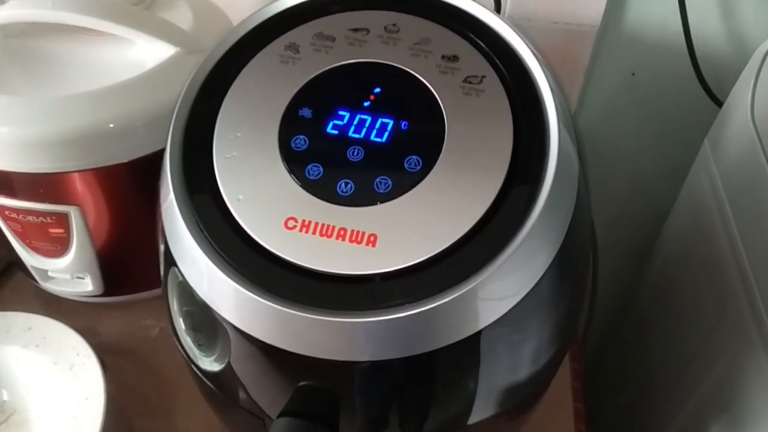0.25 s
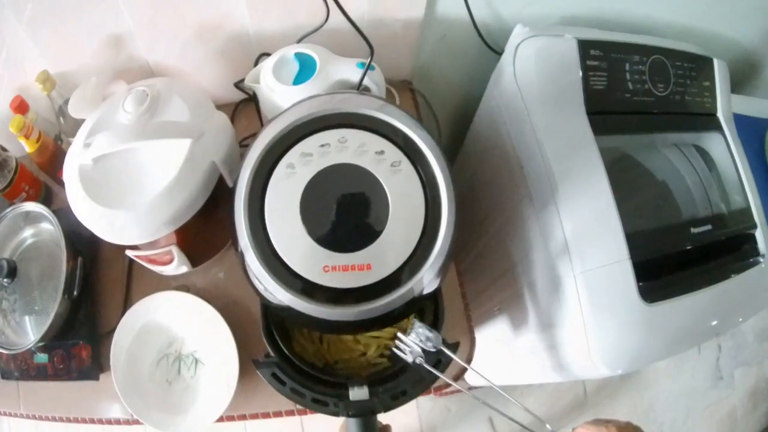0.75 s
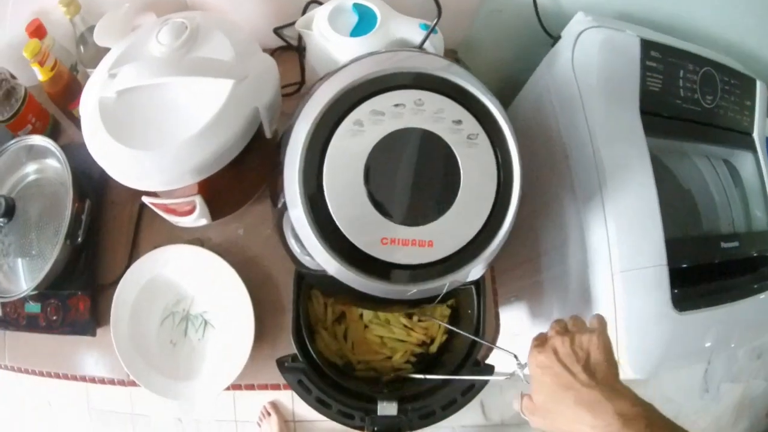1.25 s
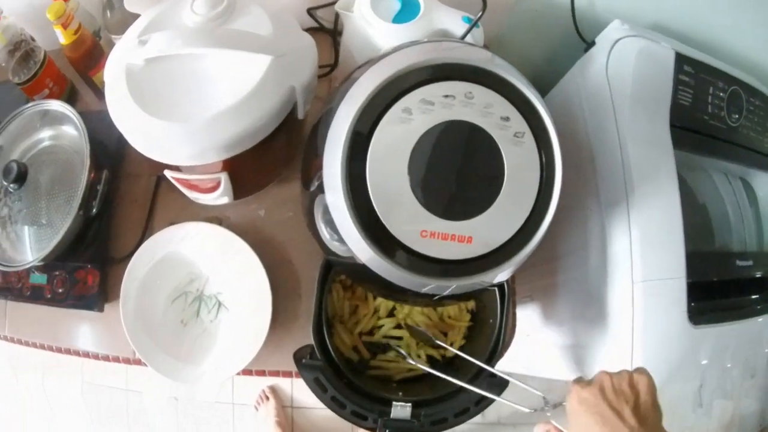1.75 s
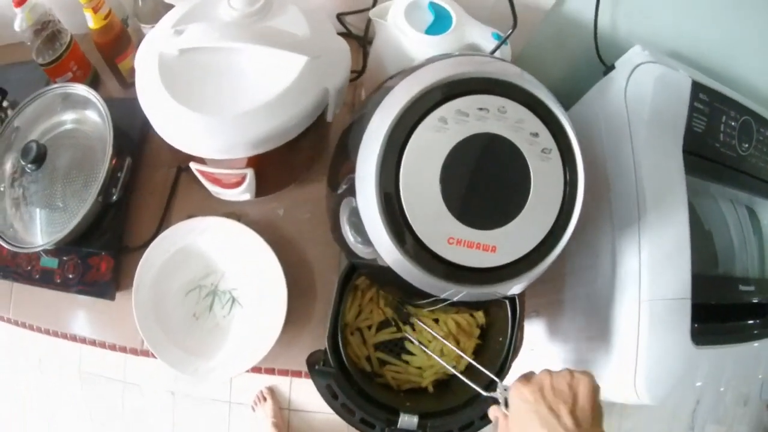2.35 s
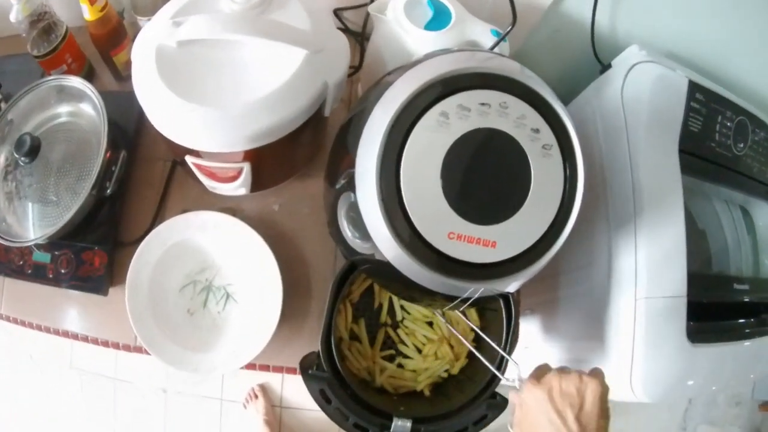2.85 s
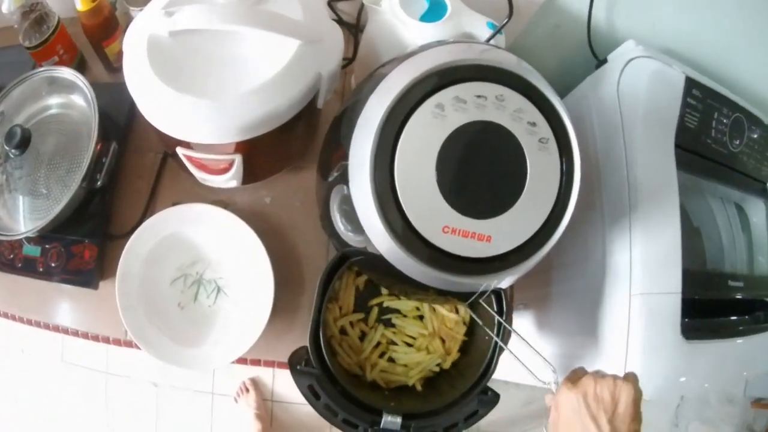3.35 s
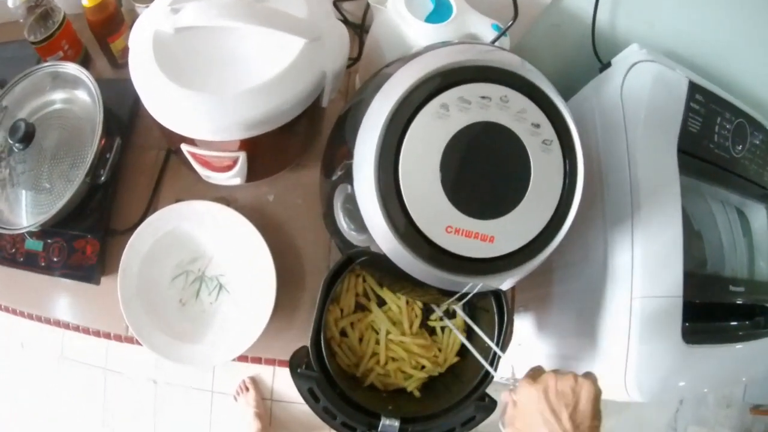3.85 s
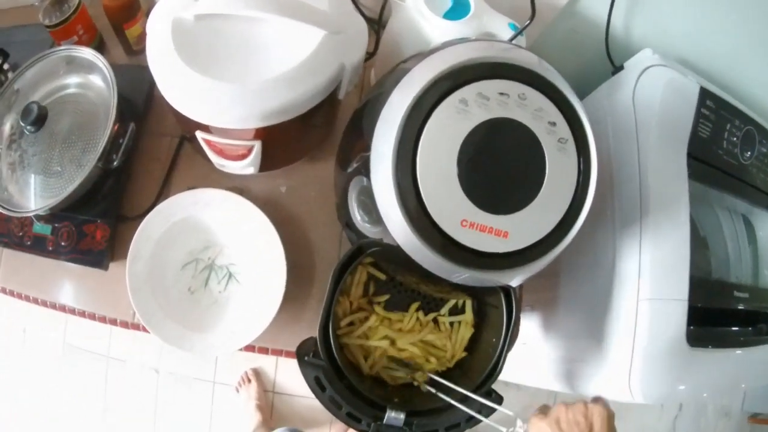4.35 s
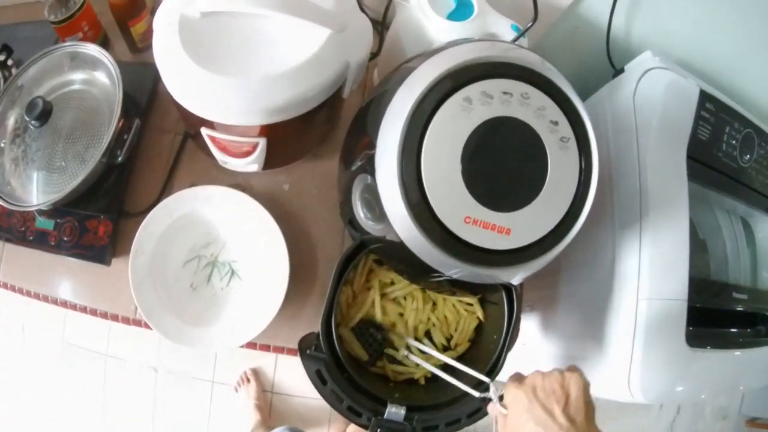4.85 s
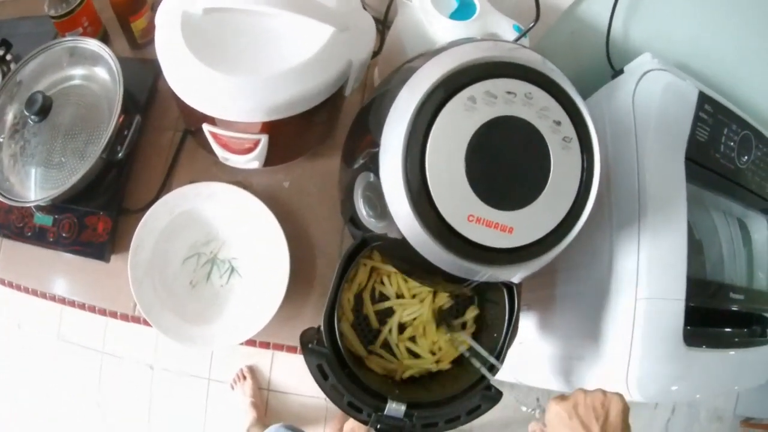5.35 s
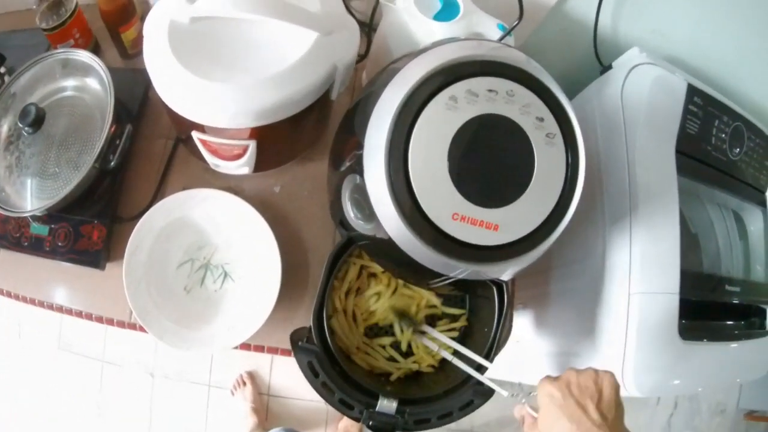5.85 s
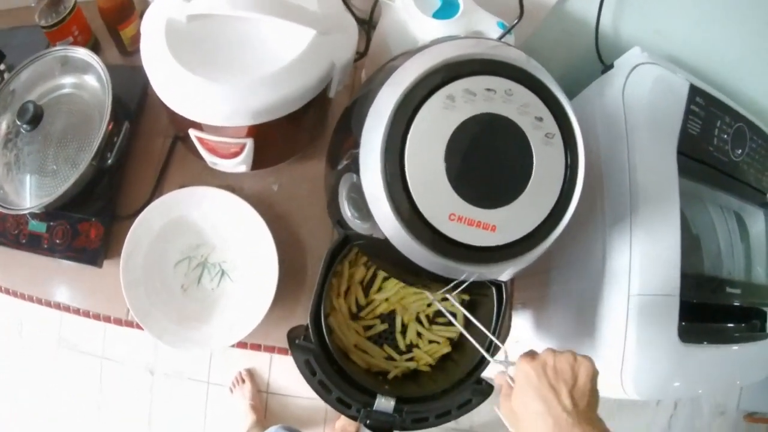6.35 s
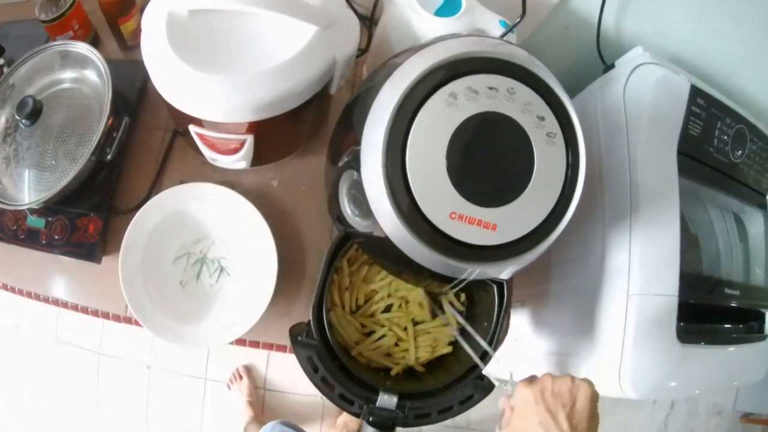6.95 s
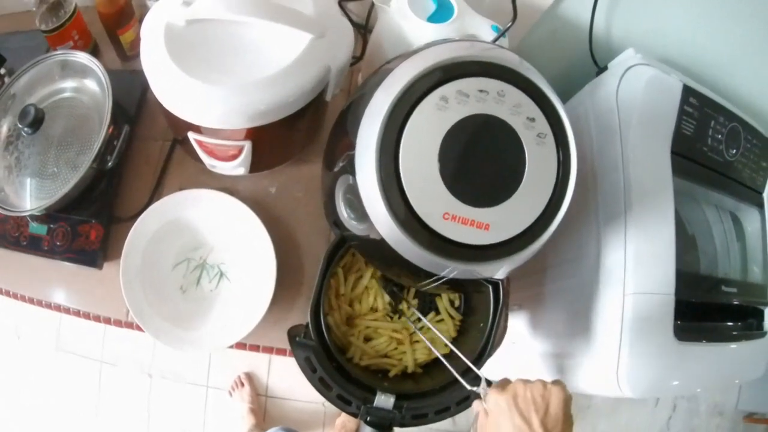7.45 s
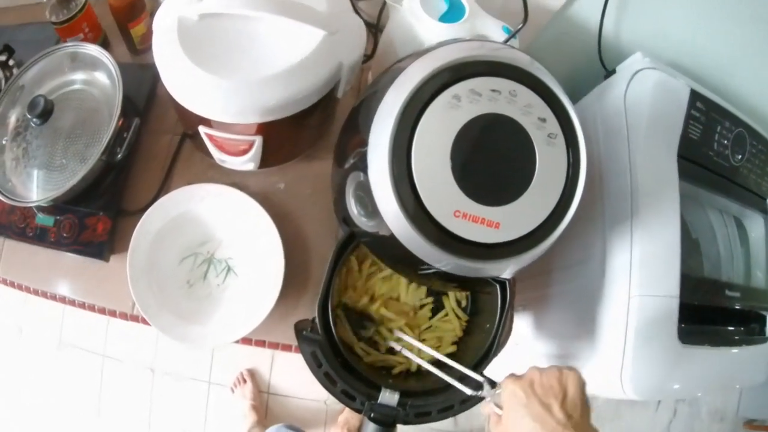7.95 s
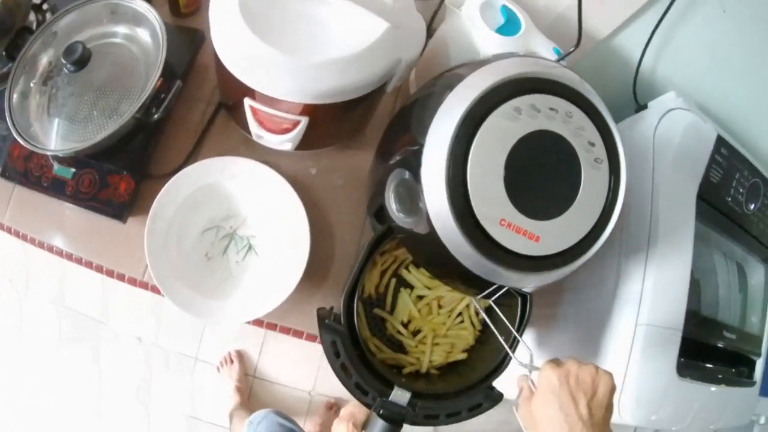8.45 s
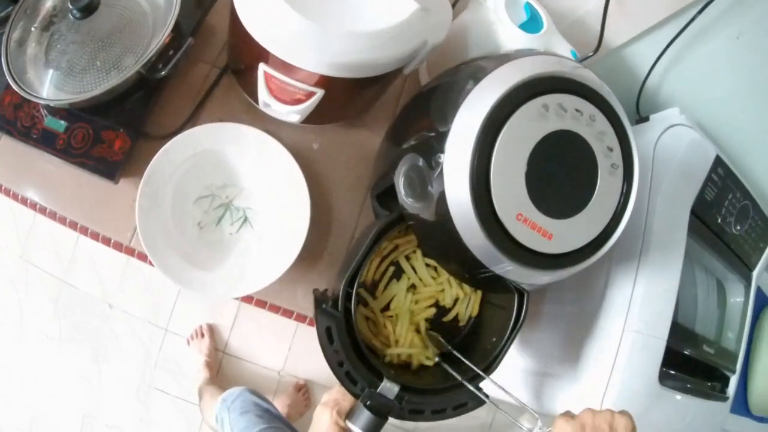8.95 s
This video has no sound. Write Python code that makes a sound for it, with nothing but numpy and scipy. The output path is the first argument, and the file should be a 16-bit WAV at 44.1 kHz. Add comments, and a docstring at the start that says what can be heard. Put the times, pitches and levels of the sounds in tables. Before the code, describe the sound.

Metal tongs scrape and clink around a perforated metal basket, turning crisp fries in a small tiled kitchen over faint hum and hiss.

```python
"""Steel tongs turn fries in a perforated metal basket in a small tiled kitchen: the tips drag and knock.
Drags: random snags excite steel modes and a dense sheet response; crisp fries tick. Knocks: decaying modes,
noise and a bright snap. Squeaks: rough sines. Behind: a dull echo, noise-band hum, hiss with a thin high
tone, and soft bass bumps."""
import sys
import numpy as np
from scipy import signal
from scipy.fft import rfft, irfft, next_fast_len
from scipy.io import wavfile
from scipy.ndimage import uniform_filter1d, map_coordinates

SR = 44100
rng = np.random.default_rng(int(sys.argv[2]) if len(sys.argv) > 2 else 0)


def bounce(signal):
    """Save signal as a 16-bit WAV file at the path given by the first command-line argument."""
    frames = np.transpose(np.atleast_2d(signal))
    limited = np.clip(frames, -1, 1)
    pcm = np.round(limited * 32767).astype(np.int16)
    wavfile.write(sys.argv[1], SR, pcm)


N = 404838


def amp(db):
    """Linear gain of a level in dB."""
    return 10 ** (np.asarray(db) / 20)


def unit(x):
    """x scaled to rms 1."""
    return x / np.sqrt(np.mean(x ** 2) + 1e-20)


def along(points, hz):
    """(Hz, value) points interpolated on a log-frequency axis."""
    point_hz, value = np.transpose(points)
    return np.interp(np.log(hz + 1), np.log(point_hz + 1), value)


def wobble(rate_hz):
    """Random curve, linear between normal-distributed knots at rate_hz."""
    knots = rng.standard_normal(int(N * rate_hz / SR) + 4)
    return map_coordinates(knots, [np.arange(N) * rate_hz / SR], order=1)


def filtered(x, response):
    """x times a response of frequency, by FFT."""
    size = next_fast_len(N + 8192)
    spectrum = rfft(x, size) * response(np.fft.rfftfreq(size, 1 / SR))
    return irfft(spectrum, size)[..., :N]


def through(x, answer, size):
    """Overlapping pieces of x, each through a fresh random answer, so no fixed colour stands out."""
    out = np.zeros(N + SR + size)
    fade = np.hanning(2 * size + 1)[:-1]
    padded = np.pad(x, (size, 2 * size))
    for start in range(0, N + size, size):
        piece = signal.fftconvolve(padded[start:start + 2 * size] * fade, answer())
        out[start:start + len(piece)] += piece
    return out[size:size + N]


# Spectrum of hiss and rumble: (f/Hz, relative level/dB per Hz)
AIR_SPECTRUM = [(12, -36), (20, -14), (103, -0.5), (156, -2), (185, -2.5), (237, -4.5), (288, -3.5),
                (425, -7.5), (502, -8), (1060, -10.5), (2250, -16), (2510, -15), (4380, -18), (5040, -19.5),
                (15300, -20.5)]
# Hum bands: (f/Hz, half-width at half amplitude/Hz, mean level/dB)
HUM_BANDS = [(61, 24, -63.5), (144.5, 16, -70.5), (185.3, 14, -68), (1090, 107, -68.5), (1237, 58, -64.5),
             (12225, 14, -74)]
AIR_DB = -54.5  # mean level


def room_tone():
    """Shaped noise for hiss and rumble, plus narrow noise bands of wavering level for hum."""
    def noise(response):
        return unit(filtered(rng.standard_normal(N), response))

    air = noise(lambda f: amp(along(AIR_SPECTRUM, f)))
    hum = np.zeros(N)
    for hz, width_hz, db in HUM_BANDS:
        level = amp(db + 0.67 * wobble(5))
        hum += level * noise(lambda f: 1 / (1 + ((f - hz) / width_hz) ** 2))
    return amp(AIR_DB + 0.47 * wobble(4)) * air + hum


def kitchen(x):
    """Tiled walls answer with a short, dull tail of low-passed, decaying noise."""
    t = np.arange(SR // 2) / SR
    fade = amp(-60 * t / 0.47)  # t60 0.47 s

    def tail():
        dull_noise = signal.lfilter([1], [1, -.4], rng.standard_normal(len(t)))
        return dull_noise * fade / np.linalg.norm(fade)

    delayed = np.pad(x, (200, 0))[:N]
    return through(delayed, tail, size=8192)


# Dull bass bumps: (t/s, nominal level/dB, f/Hz)
BASS_BUMPS = [(1.388, -48.5, 66), (2.199, -51, 70.0), (6.059, -47, 51.1), (6.619, -56, 48.4),
              (6.779, -43.5, 52.3), (7.568, -49, 68), (7.879, -47, 61.9)]


def bumps():
    """A few soft cycles of deep bass: sines under a rise-and-decay envelope."""
    out, t = np.zeros(N + SR), np.arange(SR // 5) / SR
    envelope = t / 0.017 * np.exp(1 - t / 0.014)
    for start_s, db, hz in BASS_BUMPS:
        out[round(start_s * SR):][:len(t)] += amp(db) * envelope * np.sin(2 * np.pi * hz * t)
    return out[:N]


# A sliding tip makes one mode sing: (t/s, nominal length/s, f/Hz, nominal level/dB)
TIP_SQUEAKS = [(1.598, 0.06, 4005, -54.5), (2.455, 0.018, 10150, -56), (3.129, 0.14, 1014, -61.5),
               (3.15, 0.093, 1242, -57), (4.16, 0.088, 1088, -58.5), (5.6, 0.14, 2330, -57),
               (5.64, 0.05, 3317, -46.5), (6.12, .08, 3340, -51), (6.047, 0.04, 3350, -44.5),
               (6.12, 0.045, 5320, -49), (6.333, 0.023, 3321, -52), (6.34, 0.031, 1034, -54.5),
               (6.385, 0.018, 4900, -58), (6.785, 0.023, 4150, -56), (7.581, 0.019, 10800, -50),
               (8.34, 0.042, 5220, -48)]


def squeaks():
    """A tip catches one mode: short sines of drifting phase and rough level, soft at both ends."""
    out, rough = np.zeros(N + SR), amp(2.5 * wobble(90))
    for start_s, length_s, hz, db in TIP_SQUEAKS:
        t = np.arange(round(1.6 * length_s * SR)) / SR
        swell = (1 - np.exp(-t / 0.0032)) * np.exp(-(t / length_s) ** 4)
        drift = np.cumsum(rng.standard_normal(len(t))) * 0.042
        tone = np.sin(2 * np.pi * hz * t + drift)
        out[round(start_s * SR):][:len(t)] += amp(db) * np.sqrt(2) * swell * tone
    return out[:N] * rough


# Small modes of the perforated sheet: (f/Hz, level/dB per Hz)
SHEET_SPECTRUM = [(900, -41), (1600, -15), (2000, -20), (2750, -8.5), (3100, -8.5), (3500, -3.5),
                  (3950, 0.5), (4450, -6.5), (5250, -0.5), (6300, -10), (7100, -5.5), (7900, -8),
                  (8800, -7.5), (11300, -9.5), (13600, -6.5), (15300, -14.5)]
# Sheet decay before damping: (f/Hz, nominal t60/s)
SHEET_DECAY = [(600, 0.72), (3000, 0.2), (6000, 0.15), (12000, 0.19)]


def sheet_ring(colour_db, damping, size):
    """One answer of the sheet to a tap, energy 1: noise that dies band by band."""
    hz, t, z = signal.stft(rng.standard_normal(size), SR, nperseg=256)
    t60 = along(SHEET_DECAY, hz)[:, None]
    fade_db = colour_db(hz)[:, None] - 60 * damping * t / t60
    ring = signal.istft(z * amp(fade_db), SR, nperseg=256)[1][:size]
    return ring / np.linalg.norm(ring)


# Large modes of basket and tongs: (f/Hz)
MODE_HZ = [780, 1060, 1150, 1290, 1639, 1730, 2051, 2307, 2579, 2762, 2840, 3321, 3430, 3660, 3828, 3973,
           4135, 4740, 4853, 4937, 5190, 5300, 5728, 5803, 6900, 7187, 8721, 9300, 10070, 10750]
# Same modes, same order, before tilt and damping: (relative level/dB, nominal t60/s)
MODE_LEVEL_T60 = [(-15, 0.34), (-8.5, 0.5), (-10.5, 0.81), (0.5, 0.18), (-12.5, 0.51), (-16, 0.26),
                  (-15.5, 0.61), (-11.5, 0.52), (-8.5, 0.24), (-8, 0.39), (-2.5, 0.23), (-5, 0.36),
                  (-0.5, 0.17), (-11, 0.15), (-4, 0.51), (-3, 0.33), (-17, 0.31), (-16, 0.19), (2, 0.22),
                  (-5.5, 0.15), (-0.5, 0.2), (-1.5, 0.16), (-18, 0.27), (-8.5, 0.39), (-2.5, 0.39),
                  (-22, 0.25), (-1, 0.18), (-26, 0.11), (-6, 0.14), (-6, 0.19)]
# Low clunk of the basket wall: (f/Hz, level/dB per Hz)
WALL_SPECTRUM = [(400, -25), (900, -14.5), (1500, -14.5), (3000, -35)]
# Tip knocks: (t/s, level/dB, clunk/dB, belly/dB, middle/dB, brightness/dB,
# low spot f/Hz, high spot f/Hz, lift near both/dB, damping factor)
TIP_KNOCKS = [(0.002, -36, 11, 1.5, -2, -8, 1290, 4850, 10, 2.1),
              (0.4436, -29.5, -8, -5.5, 1, 2, 3420, 5230, 5, 1.4),
              (1.1186, -34.5, -11, -3, -5, -8, 3900, 5180, 9, 1.2),
              (1.3476, -32, -10, -13, 0, -3, 3500, 6910, 11, 2),
              (1.7478, -34, -5, -16, 0, -6, 3450, 4860, 8, 1.05),
              (2.1157, -24.5, -11, -2, -0.5, -0.5, 3440, 6900, 7, 2.2),
              (2.2043, -27.5, -9, -13, -3, 7, 3900, 4900, 9, 1.7),
              (2.251, -27.5, -14, -6, 0.5, -2, 3430, 4770, 8.5, 1.45),
              (2.5176, -16, -8.5, 2.5, -1.8, -1, 3830, 5280, 5, 1.12),
              (3.1392, -36.5, -8, 1, -4, -2, 3320, 5300, 13, 1.6),
              (3.4508, -14.5, -3, 2.5, -5, -3, 2870, 5280, 7, 1.48),
              (4.1688, -39, -8, 10, 6, -13, 3840, 4760, 6, 1.45),
              (4.5456, -39, -8, -7, 0, -7, 3330, 4840, 12, 1.3),
              (4.6603, -33.5, -2, 1, -3, -9, 3430, 4960, 8, 2.6),
              (5.1503, -33, -13, -9, -2, -3, 3360, 5280, 13, 2.1),
              (5.6447, -32.5, -9, 6, 1, 8, 3330, 4640, 12, 1.8),
              (6.095, -36.5, -11, -3, 0, -4, 3360, 5400, 4, 1.2),
              (6.4794, -29, -9, -7, 0.5, -1, 3920, 4930, 4, 1.1),
              (7.587, -47, 2, -1.5, 5, 3, 3420, 10700, 8, 1.9),
              (7.9157, -19, -3, 2, -0.8, 0, 3980, 5300, 6, 0.93),
              (8.114, -36, 3, -3, -4, -6, 1290, 5300, 10, 1.8),
              (8.1607, -32.5, 2.5, -3.5, 1, -14, 3370, 5250, 4, 2.4),
              (8.2653, -32.5, -5, 0, 1, -1, 4740, 5300, 6, 2.5),
              (8.2724, -26, 2.5, 3.5, 4, -3, 4030, 4810, 9, 1.5),
              (8.3387, -31.5, -5, 6.5, -1.5, 2, 4260, 5200, 13, 1.5)]
STEP = 60  # samples between jolts of a rattling mode
SNAP_DB, SNAP_T60_S = -10.5, 0.011  # bright crack at contact, re peak of the blow
CLEAR_DB, CLEAR_PER_DB = -4.5, 0.16  # ring over clatter at 0 dB; gain per dB a knock is softer


def knocks():
    """Each knock shakes the whole sheet and rings the modes nearest its spot hardest."""
    out, t = np.zeros(N + SR), np.arange(SR // 3) / SR
    hz = np.array(MODE_HZ)[:, None]
    mode_db, t60 = np.transpose(MODE_LEVEL_T60)[..., None]

    def near(spot_hz):
        return np.exp(-(np.log(hz / spot_hz) / 0.027) ** 2)

    for (start_s, knock_db, clunk_db, belly_db, middle_db, bright_db,
         low_hz, high_hz, lift_db, damping) in TIP_KNOCKS:
        tilt = [(1350, clunk_db), (1650, belly_db), (2850, belly_db), (3300, middle_db),
                (4200, middle_db), (4700, 0), (6000, 0), (7000, bright_db)]
        level_db = mode_db + along(tilt, hz) + lift_db * (near(low_hz) + near(high_hz))
        level_db += 3.1 * rng.standard_normal(hz.shape)
        loaded_hz = hz * (1 + .003 * rng.standard_normal(hz.shape))  # fries and grip detune the steel
        jolts = rng.standard_normal((len(hz), len(t) // STEP)).cumsum(axis=1)
        rattle = 0.14 * hz / 4000 * np.repeat(jolts, STEP, axis=1)
        phase = 2 * np.pi * (loaded_hz * t + rng.random(hz.shape)) + rattle
        rings = np.sum(amp(level_db - 60 * damping * t / t60) * np.sin(phase), axis=0)

        def colour_db(f):
            return np.maximum(along(SHEET_SPECTRUM, f), along(WALL_SPECTRUM, f)) + along(tilt, f)

        clear = amp(CLEAR_DB - CLEAR_PER_DB * knock_db) * rings / np.linalg.norm(rings)
        blow = clear + sheet_ring(colour_db, damping, size=len(t))
        blow *= 1 - np.exp(-t / 0.0019)  # soft onset: the tip chatters before it lies flat
        crack = np.diff(rng.standard_normal(len(t) + 1))
        blow += amp(SNAP_DB - 60 * t / SNAP_T60_S) * np.abs(blow).max() * crack
        crest = 3 * np.sqrt(uniform_filter1d(blow ** 2, size=600).max())  # 3 x loudest short rms
        out[round(start_s * SR):][:len(blow)] += amp(knock_db) * blow / crest
    return out[:N]


# Tip strokes: (t of full speed/s, level/dB, rise/s, hold/s, fall/s, initial brightness/dB, initial body/dB)
TIP_STROKES = [(0.477, -49.5, .02, .01, 0.16, -5, 7.5), (0.674, -53.5, 0.088, .01, 0.13, 0, 1),
               (0.88, -68, 0.13, .005, 0.026, 2, 3), (.95, -69, 0.068, .003, 0.017, -1, 1),
               (1.088, -63, 0.032, .005, 0.068, -2, 1), (1.128, -51, .02, 0.028, 0.075, -19, 6),
               (1.344, -45, 0.33, .005, .09, -1.5, -4), (1.57, -53.5, .02, .06, 0.2, -8, 12.5),
               (1.756, -47, 0.072, .005, 0.12, -2.5, 1), (2.12, -48, 0.15, .005, 0.037, -17, -3),
               (2.15, -42, .08, 0.098, 0.13, -2.5, -2), (2.62, -49.5, 0.16, 0.046, 0.42, -6.5, 7),
               (2.73, -46, 0.049, .005, 0.092, -2.5, -4), (3.09, -45.5, 0.095, 0.063, 0.22, -4, 2),
               (3.543, -53, .01, .003, .03, 7, 0), (3.578, -46, 0.091, 0.13, .22, -5, 2),
               (3.95, -54, 0.026, .05, 0.12, -3, 0), (4.026, -42.5, .02, 0.098, 0.17, -2, -3),
               (4.394, -48.5, 0.014, .005, 0.072, -6, -9), (4.587, -41, 0.17, .005, 0.14, -2.5, -1.5),
               (4.735, -61, .02, .005, .07, 5, 0), (4.846, -54.5, 0.015, .005, .07, -4, 12),
               (5.038, -42, .1, 0.036, 0.07, 0.5, -7), (5.154, -42.5, 0.01, .003, 0.048, 5, 5.5),
               (5.424, -51, 0.016, 0.07, 0.32, 0.5, 5), (5.576, -45.5, 0.19, 0.044, 0.088, -11, 4.5),
               (5.66, -49, .05, .005, .24, 2, 6), (6.05, -49, 0.13, 0.013, .04, -18, 3),
               (6.148, -42, 0.095, .005, 0.15, 2, 1), (6.344, -56, 0.13, 0.0039, 0.068, -4, 16),
               (6.532, -46.5, 0.11, 0.1, 0.19, -3.5, 6), (6.788, -59, 0.048, 0.0046, 0.039, -12, 14),
               (6.842, -56.5, 0.056, .005, 0.069, 2, 13), (6.998, -57, 0.035, .01, .25, -15, 12.5),
               (7.124, -50, 0.051, .02, 0.078, -12, 1), (7.182, -42.5, 0.12, 0.047, 0.17, -2.5, -2),
               (7.584, -59, 0.076, .02, .2, 0, 11), (7.688, -55.5, 0.091, .005, .15, -7, 8),
               (8.026, -44, 0.11, 0.056, 0.25, -9, 8), (8.172, -49, .03, .01, 0.072, -20, 13),
               (8.3, -54, 0.17, 0.073, 0.21, -9, 15.5), (8.565, -49.5, 0.051, 0.026, 0.17, -0.5, 5),
               (8.635, -53, .03, 0.017, 0.17, -4, 0), (8.74, -52, 0.25, .02, 0.19, -3.5, -1),
               (8.905, -64, 0.037, .005, 0.11, 6, 3), (9.077, -56.5, 0.08, .005, 0.099, -5, 5),
               (9.18, -55, 0.1, .01, .1, 0, 1)]
SWING_DB = 20  # gained over the rise, lost over the fall
DULLING, SETTLING = 0.52, 0.26  # treble lost, body gained: dB per dB faded
RESTING_DB = -77  # tips shifting among the fries between strokes


def drag():
    """Level, treble and body gains of all strokes: each rises, holds and fades, duller and deeper."""
    t = np.arange(N) / SR
    level = np.full(N, amp(RESTING_DB))
    treble, body = level.copy(), level.copy()
    for full_s, db, rise_s, hold_s, fall_s, bright_db, body_db in TIP_STROKES:
        faded_db = SWING_DB * np.maximum(t - full_s - hold_s, 0) / fall_s
        unrisen_db = SWING_DB * np.maximum(full_s - t, 0) / rise_s
        gain = amp(db - unrisen_db - faded_db)
        level += gain
        treble += gain * amp(bright_db - DULLING * faded_db)
        body += gain * amp(body_db + SETTLING * faded_db)
    return level, treble / level, body / level


def mode(x, hz, t60):
    """x through one two-pole resonance."""
    r = amp(-60 / (t60 * SR))
    turn = 2 * np.pi * hz / SR
    return signal.lfilter([np.sin(turn)], [1, -2 * r * np.cos(turn), r * r], x)


BODY_HZ = 2400  # wall modes lie below


def strokes():
    """Dense tiny snags ring modes and sheet; the moving contact point shifts the share of each mode."""
    level, hiss, press = drag()  # a hard press also reaches the low modes of the wall
    snags = unit(rng.standard_normal(N) * amp(6.6 * rng.standard_normal(N).clip(-2, 2)))
    force = level * amp(1.1 * wobble(45) + 0.83 * wobble(200)) * snags
    rings = np.zeros(N)
    for hz, (db, t60) in zip(MODE_HZ, MODE_LEVEL_T60):
        push = force * amp(db + 3.6 * wobble(7)) * (press if hz < BODY_HZ else 1)
        rings += mode(push, hz, 0.23 * t60) / np.sqrt(t60 * SR)

    def sheet_answer(damping, size):
        return sheet_ring(lambda hz: along(SHEET_SPECTRUM, hz), damping, size)

    sheet = through(force, lambda: sheet_answer(damping=3.9, size=4096), size=4096)
    # crisp fries crack and tick: 700 impulses/s on average
    crumbs = (rng.random(N) < 700 / SR) * amp(4 * rng.standard_normal(N).clip(-2, 2))
    ticks = level * amp(-10) * unit(crumbs)
    sheet += through(ticks, lambda: sheet_answer(damping=12, size=1024), size=8192)
    hiss_gain = hiss * amp(1.4 * wobble(60) + 1.85 * wobble(250))  # faster drags hiss more
    treble_change = filtered(sheet * (hiss_gain - 1), lambda hz: 1 / (1 + (6500 / (hz + 1)) ** 8))
    return amp(-1.5) * rings + sheet + treble_change


def scene():
    """Tongs, their echo, the room and the bass bumps."""
    tongs = strokes() + knocks() + squeaks()
    return (tongs + amp(-8.0) * kitchen(tongs) + room_tone() + bumps())[None]


TOP_HZ = 15350


def record(dry):
    """Steep low-pass: nothing is kept from TOP_HZ up."""
    return filtered(dry, lambda hz: hz < TOP_HZ)


dry = scene()
out = record(dry)
bounce(out)
```